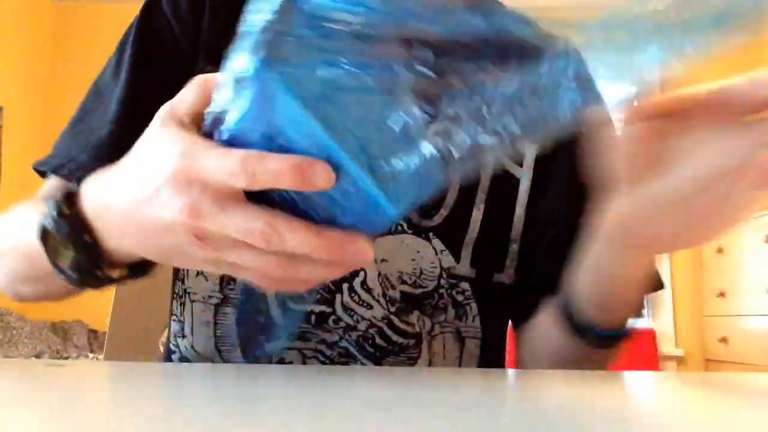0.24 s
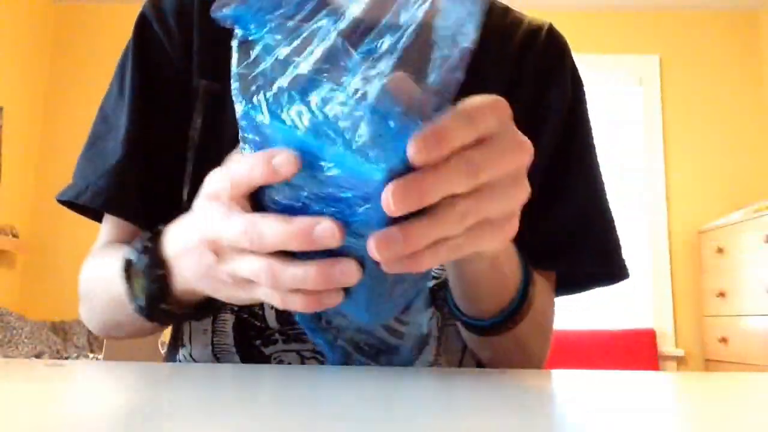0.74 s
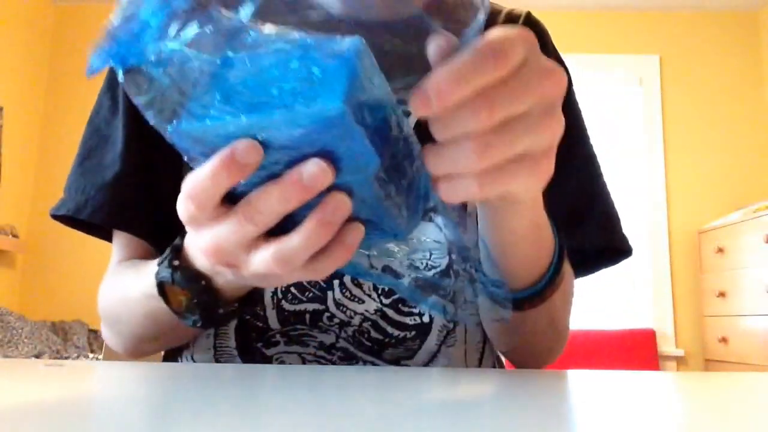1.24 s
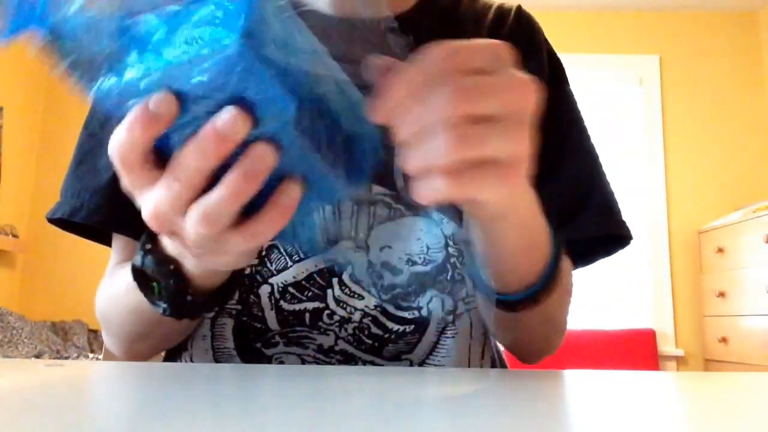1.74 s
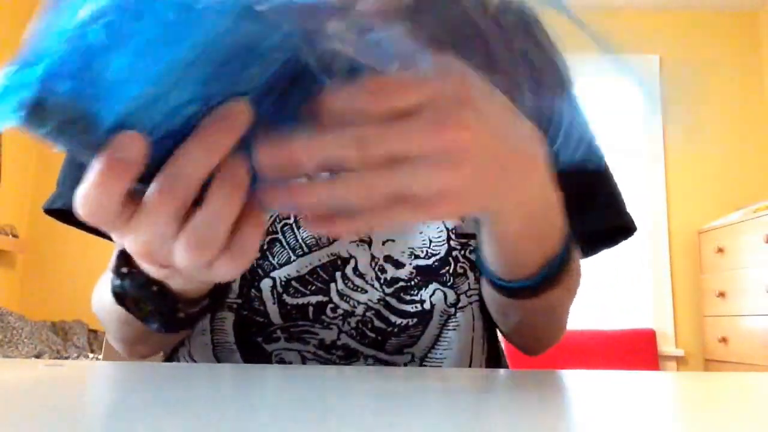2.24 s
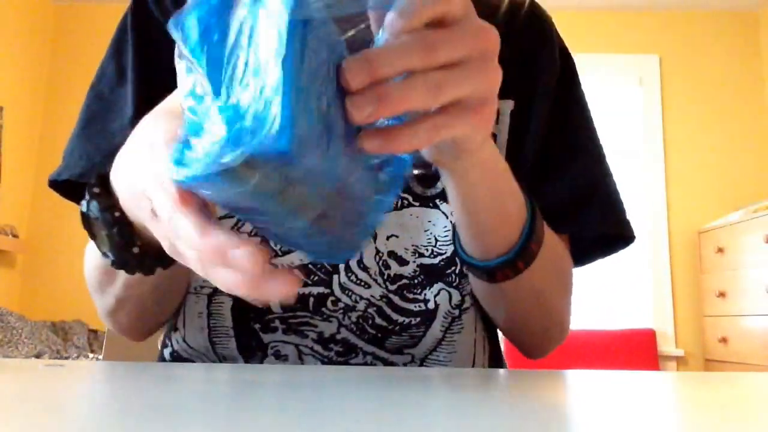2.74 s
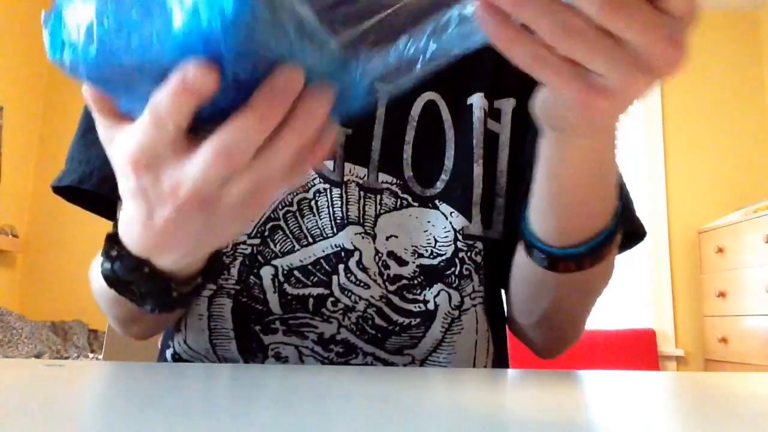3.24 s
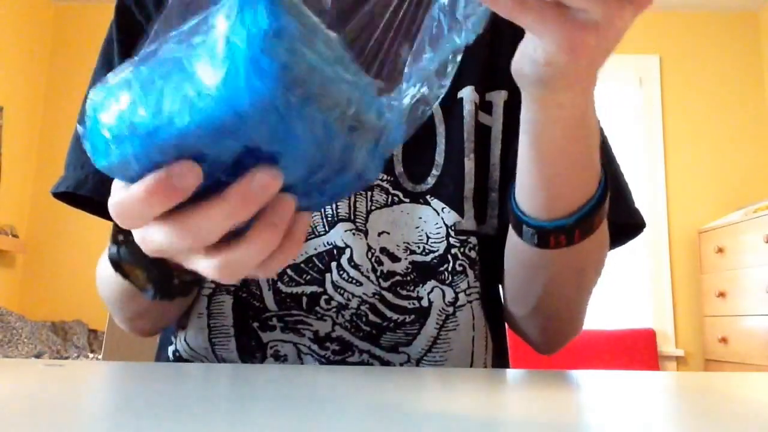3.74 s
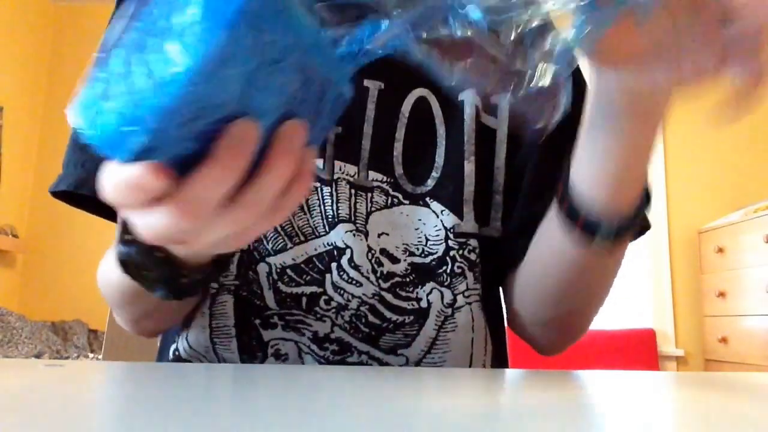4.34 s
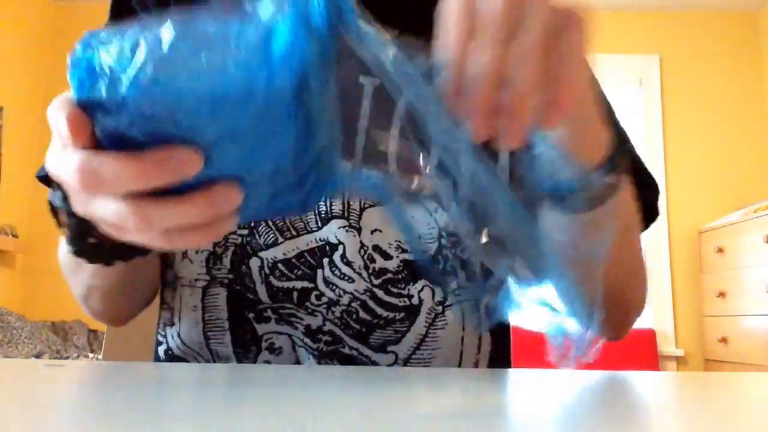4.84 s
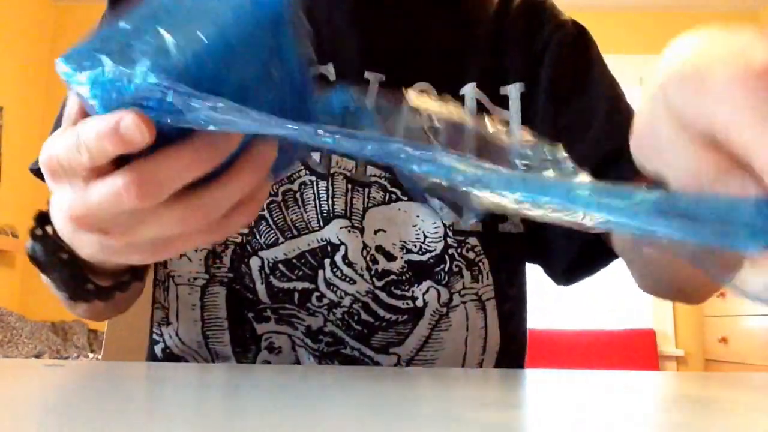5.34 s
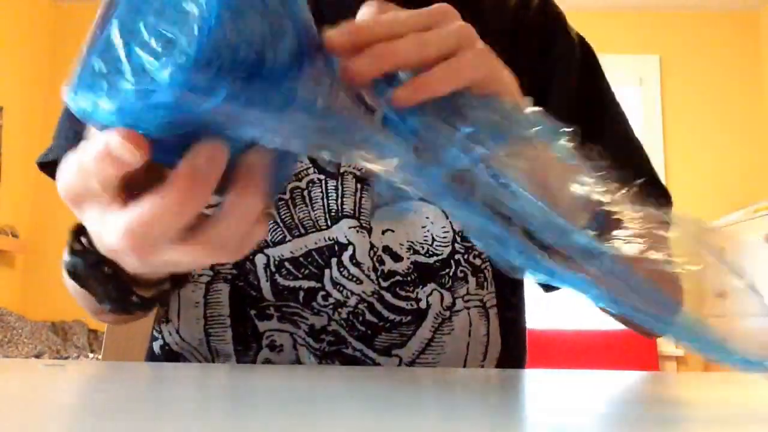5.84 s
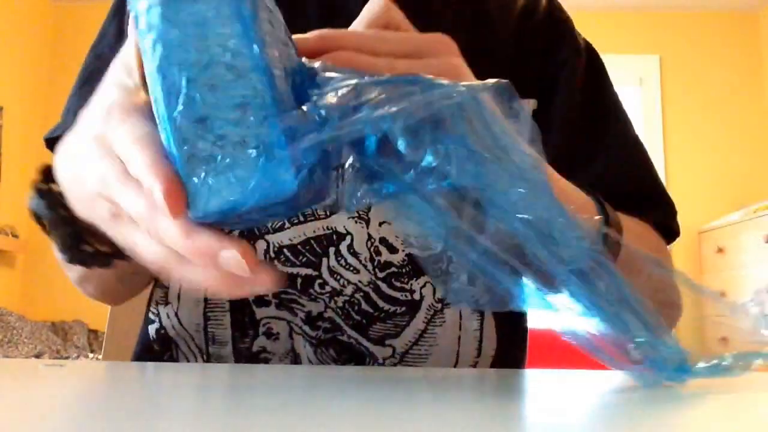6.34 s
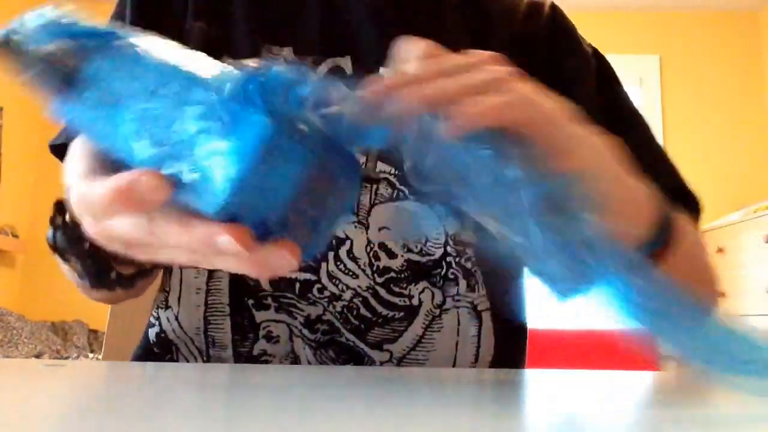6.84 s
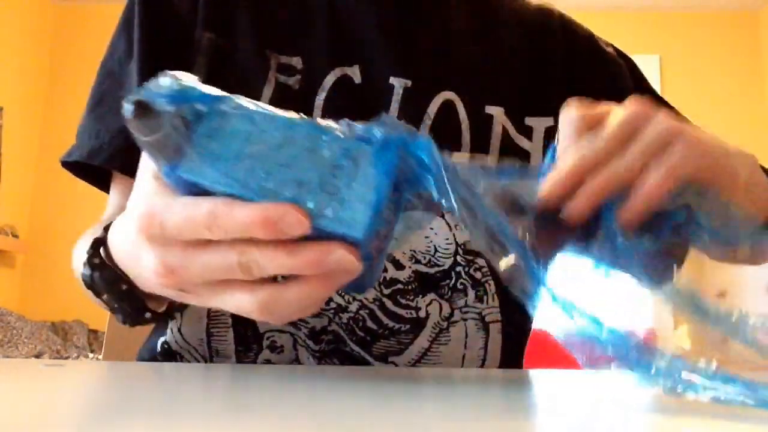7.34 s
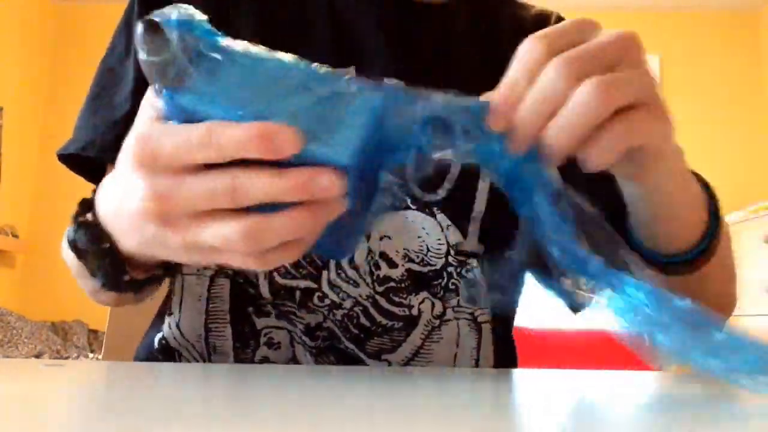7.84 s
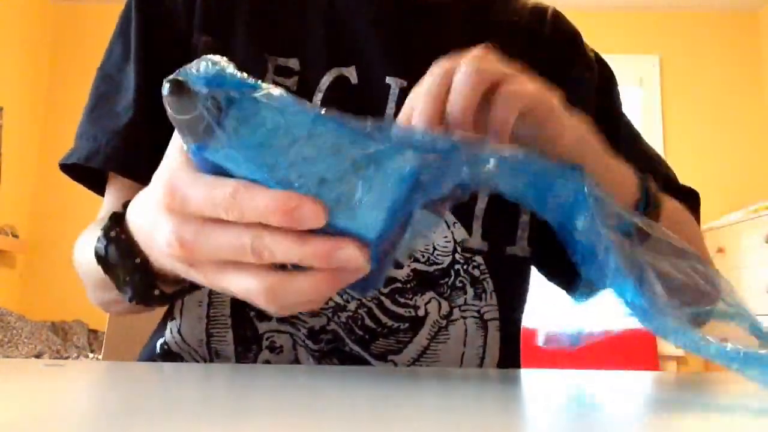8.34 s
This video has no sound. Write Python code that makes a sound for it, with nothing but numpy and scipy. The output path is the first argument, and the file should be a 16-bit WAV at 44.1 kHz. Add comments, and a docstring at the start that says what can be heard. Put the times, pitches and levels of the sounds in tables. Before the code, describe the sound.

Thin plastic cling film crinkles and crackles close by as hands pull it off a block, with sharp snaps and brief rips.

```python
"""At a table in a small room, hands pull cling film off a wrapped block, heard from close by.
The thin sheet buckles in swarms of tiny clicks that thicken with each pull, and single creases snap
through. Stick-slip friction between clinging layers makes stuttering rips and brief squeaks.
The block knocks dully, and the room booms after the loudest rip. Short reflections and one
standing wave colour the sound of the film, and a low rumble fills the room."""
import sys
import numpy as np
from scipy import signal
from scipy.fft import rfft, irfft
from scipy.io import wavfile
from scipy.ndimage import uniform_filter1d

SR = 44100
rng = np.random.default_rng(int(sys.argv[2]) if len(sys.argv) > 2 else 0)


def wav_record(signal):
    """Record a signal, one row per channel, as 16-bit PCM in the file named by sys.argv[1]."""
    frames = np.transpose(np.atleast_2d(signal))
    bounded = np.clip(frames, -1, 1)
    # unit amplitude maps onto the largest positive 16-bit level
    quanta = np.round(bounded * 32767).astype(np.int16)
    wavfile.write(sys.argv[1], SR, quanta)


N = 379260
TIME, FREQS = np.arange(N) / SR, np.fft.rfftfreq(N, 1 / SR)


def crinkle(levels_db):
    """Buckling radiates the elastic energy stored in the film; harder pulls shed more buckles."""
    crackle_db = levels_db[1]
    swarm = buckles(per_s=3000 * amp(0.08 * (crackle_db + 40)))
    swarm = refold(swarm, depth_db=1.85, patch_hz=1500, patch_s=0.021)
    swarm = swarm * flurries(depth_db=1.74, length_s=0.01)
    # radiation spectrum of the film: frequency_hz, gain_db
    film_spectrum = [(25, -75), (45, -32), (70, -10), (170, -4.5), (310, -2.5), (400, -2.5), (800, -5.5),
                     (1180, -5.5), (1500, -3), (3500, -2.5), (4400, -5.5), (12500, -5.5), (15500, -11.5)]
    spectrum = rfft(colour(swarm, amp(read(film_spectrum, FREQS)) * hollow()))
    # complementary bands, low to high: body, crackle, fizz, sizzle
    crossovers = [below(hz, order=6) ** 2 for hz in (1500, 5500, 10500)]
    bands = np.diff([np.zeros_like(FREQS), *crossovers, np.ones_like(FREQS)], axis=0)
    band_gains_db = [-1.24, -0.3, -3.17, -0.98]
    film = sum(amp(level_db + gain_db) * steady(irfft(spectrum * band, N), window_s=0.21)
               for band, level_db, gain_db in zip(bands, levels_db, band_gains_db))
    return film * flurries(depth_db=0.9, length_s=0.032)  # the film gives way unevenly


def buckles(per_s, spread_db=3.5, decay_cycles=1.08, tick_db=2.0, tick_s=0.0004, rub_db=-3.5, size=128):
    """Buckles form a Poisson process; each impulse ticks and rings its own small facet of film."""
    onsets = np.flatnonzero(rng.random(N) < per_s / SR)
    gain = amp(spread_db * np.minimum(rng.exponential(1, (len(onsets), 1)), 3.6))
    hz = 700 * (15000 / 700) ** rng.random((len(onsets), 1))
    t = np.arange(size) / SR
    rings = np.sin(2 * np.pi * hz * t) * np.exp(-t * hz / decay_cycles)
    polarity = rng.choice([-1, 1], hz.shape)
    rings = unit(rings * hz * polarity)  # small facets flip faster, so they radiate more strongly
    ticks = unit(rng.standard_normal(rings.shape) * np.exp(-t / tick_s))
    clicks = gain * (rings + amp(tick_db) * ticks)
    positions = onsets[:, None] + np.arange(size)
    swarm = np.bincount(positions.ravel(), clicks.ravel(), N)[:N]
    sliding_hiss = amp(rub_db) * rng.standard_normal(N)
    return steady(swarm, window_s=0.024) + sliding_hiss


def refold(x, depth_db, patch_hz, patch_s):
    """Radiation depends on shape: as the sheet refolds, its spectrum shifts in brief patches."""
    spectra = signal.stft(x, nperseg=256, noverlap=192)[2]
    bins, frames = round(patch_hz * 256 / SR), round(patch_s * SR / 64)
    patches = uniform_filter1d(rng.standard_normal(spectra.shape), bins, axis=0)
    patches = unit(uniform_filter1d(patches, frames, axis=1))
    return signal.istft(spectra * amp(depth_db * patches), nperseg=256, noverlap=192)[1][:N]


def flurries(depth_db, length_s):
    """Random amplitude modulation: buckles set each other off, so they come in uneven flurries."""
    return amp(depth_db * unit(smooth(rng.standard_normal(N), length_s)))


def hollow():
    """Cavity resonance between block, hands and table raises peaks in a gain over FREQS."""
    # cavity resonances, each added to a gain of one: centre_hz, width_hz, peak_db
    resonances = [(475, 140, -8.5), (645, 180, -6), (960, 154, 3)]
    return 1 + sum(amp(db) / (1 + (2 * (FREQS - hz) / width_hz) ** 2) for hz, width_hz, db in resonances)


def handling():
    """Incoherent sources add in power: pulls, grips and rustle set the dB levels of the four bands."""
    # hands draw film off the block; the last three are relative to the strength (taut sheet, peeling,
    # finest wrinkles): start_s, hold_s, strength_db, rise_s, release_s, body_db, fizz_db, sizzle_db
    pulls = [(0.0, .12, -42, 0.041, 0.071, -11, -3, 6.5), (0.924, .11, -32, .055, .055, -1.5, -3.5, -0.5),
             (1.61, 0.0076, -35, 0.017, 0.14, 0.5, -3, 1), (1.699, 0.018, -36, 0.12, 0.092, -1, -6, 3),
             (1.803, .012, -28.5, .12, .095, 0, -0.5, 2), (2.86, 0.078, -33, 0.14, 0.093, -1.5, 2.5, 2),
             (2.96, 0.0638, -30.5, 0.11, 0.082, -1.5, 5.5, -1),
             (3.09, 0.0721, -31.5, 0.18, 0.066, -0.5, 4, 2),
             (3.875, 0.039, -32.5, 0.071, 0.094, -1.5, 7, 3), (4.002, .1, -54, 0.081, .09, 1.5, 12, -3),
             (4.228, 0.1, -48.5, .14, 0.099, 0, 7.5, 3.5), (4.654, 0.092, -49, 0.028, 0.23, -0.5, 4, -5),
             (4.96, 0.026, -34, 0.086, .14, -1, 0.5, 4), (5.034, 0.016, -29, .03, .2, -4, -2, 0),
             (5.127, .19, -40, .05, .28, -10, -1.5, 3), (5.679, .27, -48, 0.1285, .25, -5, 1, 0),
             (6.82, .1, -30, 0.14, 0.19, -2, -2, -3.5), (7.169, .02, -28, .075, .18, -1.5, -1, -7.5),
             (7.705, 0.11, -28, 0.071, 0.07, -4, -2.5, 3.5), (7.869, .16, -45.5, 0.048, 0.098, -7, -2, 4),
             (8.496, 0.087, -26, 0.15, 0.098, -1.5, -4.5, -4)]
    # fingers shift their grip and crush a little film: peak_s, strength_db, treble_lift_db
    grips = [(0, -33, -2.5), (.07, -38, -7), (.13, -41, -2), (.43, -58, -8), (0.536, -46, -2),
             (0.668, -42, 0.5), (.745, -51.5, 4), (.785, -46, 0.5), (1.272, -39, -2), (1.525, -50, 0.5),
             (2.04, -47, 4.5), (2.11, -45, -3.5), (2.26, -47, -4), (2.322, -36, 0), (2.42, -43, -1),
             (2.467, -36.5, 3), (2.612, -45, 1.5), (3.32, -50, 3), (3.485, -50, 3), (3.6, -46.5, 1),
             (4.345, -45, 4), (5.31, -40.5, 2.5), (5.42, -40, -1), (5.565, -48.5, -5), (5.885, -42, -6),
             (6.15, -48, 1.5), (6.245, -46, -1), (6.465, -44, 0.5), (6.555, -50, 2.5), (6.65, -49.5, 1.5),
             (6.71, -58, -3), (7.045, -34, -4.5), (7.36, -47, -5), (7.465, -45, -1), (7.675, -38, -9),
             (8.118, -37.5, -4), (8.32, -50, -8)]
    # the loose sheet rustles while the hands move: time_s, strength_db
    rustle = [(0, -47), (.36, -63), (.62, -55), (.85, -54), (1.15, -67), (1.43, -62), (1.95, -55),
              (2.55, -50), (2.7, -55), (3.25, -52), (3.72, -56), (4.4, -58), (4.56, -68), (4.85, -50),
              (5.53, -58), (6.25, -54), (7.42, -51), (7.6, -57), (8.27, -56.5)]
    rustle_db = np.interp(TIME, *np.transpose(rustle))
    power = band_powers(rustle_db, body_db=-3, fizz_db=1.5, sizzle_db=-3)
    grip_rise_s, grip_release_s, grip_body_db = 0.06, 0.07, -3
    grip_strokes = [(peak_s, 0, db, grip_rise_s, grip_release_s, grip_body_db, lift_db, lift_db)
                    for peak_s, db, lift_db in grips]
    for start_s, hold_s, strength_db, rise_s, release_s, *colour_db in pulls + grip_strokes:
        level_db = strength_db + stroke(start_s, hold_s, rise_s, release_s)
        audible = level_db > -90
        power[:, audible] += band_powers(level_db[audible], *colour_db)
    return 10 * np.log10(power) + pauses()


def band_powers(level_db, body_db, fizz_db, sizzle_db):
    """Power is amplitude squared: one row each for body, crackle, fizz and sizzle."""
    return amp([[body_db], [0], [fizz_db], [sizzle_db]]) ** 2 * amp(level_db) ** 2


def stroke(start_s, hold_s, rise_s, release_s, swell_db=20):
    """Exponential envelope of a hand movement, in dB: it swells until start_s, holds and slackens."""
    before = np.maximum(start_s - TIME, 0) / rise_s
    after = np.maximum(TIME - start_s - hold_s, 0) / release_s
    return -swell_db * (before + after)


def pauses(settle_s=0.045, recover_s=0.012):
    """Excitation falls as the hands come to rest and returns as they set off: level dips in dB."""
    # brief rests of the hands: restart_s, depth_db
    rests = [(.66, 3), (2.66, 4), (3.585, 6), (4.165, 8), (5.535, 8.5), (6.615, 10), (7.635, 9), (8.295, 9)]
    dip_db = np.zeros(N)
    for restart_s, depth_db in rests:
        settling = np.exp(-np.maximum(restart_s - recover_s - TIME, 0) / settle_s)
        resting = np.clip((restart_s - TIME) / recover_s, 0, 1)
        dip_db -= depth_db * settling * resting
    return dip_db


def snaps(levels_db):
    """Snap-through of a crease gives a sharp front, a spray of tiny wrinkles and a short facet ring."""
    # the loudest creases, levels relative within each layer: start_s, ring_db, pitch_hz, tick_db
    loud_creases = [(0.0465, -17.5, 2920, -32), (.0558, -21, 1810, -28), (.074, -19.5, 1103, -31),
                    (0.4571, -29.5, 990, -48), (.51, -14.5, 3090, -30), (.5309, -20, 2510, -34),
                    (0.6298, -21.5, 3130, -35), (.6889, -23, 2360, -18), (0.813, -18, 3720, -26),
                    (0.828, -20, 1699, -28), (0.9199, -13, 2350, -18), (.966, -23, 1450, -16),
                    (0.9921, -10, 2540, -20), (1.031, -8, 2760, -16), (1.0393, -15, 1090, -11),
                    (1.0667, -26, 1930, -29), (1.1986, -21, 2650, -22.5), (1.271, -28, 1450, -24.5),
                    (1.54, -19, 3520, -29), (1.6108, -9, 1713, -13.5), (1.7055, -12.5, 1990, -33),
                    (1.8425, -5, 1830, -10), (1.9137, -22, 2072, -27), (2.004, -21.5, 2900, -21.5),
                    (2.158, -20, 2750, -25), (2.3202, -30, 2292, -30), (2.5126, -22.5, 1800, -26.5),
                    (2.5979, -19.5, 2117, -20), (2.6605, -36.5, 2011, -20.5), (2.7193, -19.5, 1971, -17),
                    (2.744, -27, 1902, -18.5), (2.777, -18, 1353, -11.5), (2.85, -13.5, 955, -9.5),
                    (2.9502, -6.5, 1596, -13), (3.0221, -8.5, 1560, -11), (3.089, -12, 1700, -15),
                    (3.3832, -16.5, 2419, -24.5), (3.489, -30.5, 1212, -31), (3.8195, -22, 1980, -30),
                    (3.849, -21, 1510, -22.5), (3.8856, -10.5, 1000, -23), (3.9101, -14, 1350, -19),
                    (3.958, -20.5, 1060, -30), (3.9741, -19.5, 1768, -10.5), (4.0669, -29.5, 846.3, -21),
                    (4.088, -35, 1340, -20.5), (4.1295, -32, 1797, -26.5), (4.3298, -24.5, 2071, -16.5),
                    (4.6627, -26.5, 1040, -31), (4.6987, -24, 1559, -27), (5.031, -12, 980, -4.5),
                    (5.0465, -5, 2330, -6), (5.1185, -11.5, 1980, -9), (5.1888, -14.5, 2119, -23),
                    (5.3079, -18, 1422, -14), (5.3345, -15.5, 2132, -22), (5.429, -17, 830, -21),
                    (5.698, -22.5, 2592, -34), (6.219, -25, 1410, -32), (6.3444, -19, 3337, -32),
                    (7.0337, -16, 1582, -15), (7.2295, -7.5, 2981, -13), (7.3083, -12.5, 2157, -14.5),
                    (7.71, -13, 2140, -9), (7.7463, -13, 2588, -5.5), (7.7525, -4, 2679, -12),
                    (7.7864, -10.5, 1893, -7.5), (7.8391, -17, 3176, -19), (7.894, -13.5, 2644, -15.5),
                    (7.9918, -29, 1677, -15.5), (8.0276, -20.5, 3873, -29), (8.1101, -16, 2095, -12),
                    (8.3923, -17, 1684, -36), (8.5299, -5, 1436, -24), (8.566, -6, 1231, -16)]
    rings, ticks = np.zeros(N), np.zeros(N)
    for start_s, ring_db, pitch_hz, tick_db in loud_creases + lesser_creases(levels_db):
        add(rings, start_s, amp(ring_db) * facet(pitch_hz, swell_cycles=0.55))
        front = ring(rng.uniform(6000, 11000), decay_s=0.00011)
        spray = np.tanh(tick(decay_s=0.0008))
        add(ticks, start_s, amp(tick_db) * (front + spray))
    return amp(-4.0) * colour(rings, above(410, order=3)) + colour(ticks, above(2800, order=2))


def lesser_creases(levels_db, usual_db=-45, usual_per_s=30, spread_db=2, spread_octaves=0.35):
    """A Poisson process draws rows for snaps(), denser and louder as the handling grows stronger."""
    rate_growth, level_growth = 0.18, 0.63  # dB per dB of handling
    _, crackle_db, fizz_db, _ = levels_db - usual_db
    per_s = usual_per_s * amp(rate_growth * crackle_db)
    onsets = np.flatnonzero(rng.random(N) < per_s / SR)
    loud, sharp, high = np.clip(rng.standard_normal((len(onsets), 3)), -2, 2).T
    ring_db = -32 + level_growth * crackle_db[onsets] + spread_db * loud
    tick_db = -29.5 + level_growth * fizz_db[onsets] + spread_db * sharp
    pitch_hz = 1880 * 2 ** (spread_octaves * high)
    return list(zip(onsets / SR, ring_db, pitch_hz, tick_db))


def facet(hz, swell_cycles, size=600):
    """A heavily damped oscillation: a facet of film swells as it flips over, then dies away."""
    cycles = hz * np.arange(size) / SR
    envelope = cycles / swell_cycles * np.exp(1 - cycles / swell_cycles)
    return np.sin(2 * np.pi * cycles) * envelope


def rips(fade_db=4):
    """Stick-slip friction: each uneven slip plucks the taut sheet, more weakly as the grip goes."""
    # clinging layers let go in runs of slips: start_s, level_db, length_s, slips_per_s, pitch_hz
    runs = [(1.6052, -17, 0.0046, 670, 1760), (2.992, -14, 0.031, 180, 1650), (3.866, -16, 0.032, 166, 750),
            (5.027, -14.5, .033, 133, 400), (6.824, -11.5, 0.0032, 496, 660.7),
            (6.8345, -12, 0.003, 740, 680), (6.89, -18, 0.026, 474, 600.5),
            (7.041, -17, 0.0038, 294, 398.8), (7.172, -3, .0125, 472, 706),
            (8.1117, -17.5, 0.0028, 1000, 1198)]
    out = np.zeros(N)
    for start_s, level_db, length_s, slips_per_s, pitch_hz in runs:
        for k in range(int(length_s * slips_per_s) + 1):
            jitter, scatter_db = rng.standard_normal(2)
            slip = ring(pitch_hz, decay_s=0.51 / pitch_hz) + amp(-2.5) * tick(decay_s=0.00084)
            slip_s = start_s + (k + 0.073 * jitter) / slips_per_s
            slip_db = level_db + scatter_db - fade_db * k / slips_per_s / length_s
            add(out, slip_s, amp(slip_db) * slip)
    return colour(out, above(186, order=3) * below(5100, order=2))


def squeaks(roughness=0.11):
    """Rapid stick-slip cycles merge into a rough note that glides with the tension of the film."""
    # stretched film rubs against itself: start_s, level_db, length_s, start_hz, end_hz
    glides = [(0.644, -45, 0.02, 1330, 2100), (0.726, -48, 0.024, 3020, 3550),
              (0.761, -41.5, 0.016, 4020, 4150), (0.762, -41.5, 0.012, 1980, 2450),
              (1.604, -28.5, 0.0068, 2060, 1690), (1.621, -30, .007, 1830, 1700)]
    out = np.zeros(N)
    for start_s, level_db, length_s, start_hz, end_hz in glides:
        size = int(length_s * SR)
        jitter = unit(uniform_filter1d(rng.standard_normal(size), size=30))
        pitch_hz = np.linspace(start_hz, end_hz, size) * (1 + roughness * jitter)
        note = np.sin(2 * np.pi * np.cumsum(pitch_hz) / SR)
        add(out, start_s, amp(level_db) * unit(note * np.hanning(size)))
    return out


def knocks_and_boom():
    """Damped free vibration: dull knocks of the block, and the room's low boom after the loudest rip."""
    # knocks of the block and one boom of the room: start_s, level_db, pitch_hz, t60_s
    low_notes = [(1.82, -41, 65, 0.13), (3.89, -42, 59.9, 0.11), (2.83, -35, 216, 0.16),
                 (2.95, -37, 67.92, 0.19), (3.14, -28.5, 167.9, 0.16), (4.577, -47, 338.4, 0.27),
                 (5.028, -24.5, 165, 0.088), (5.045, -29, 60, 0.12), (7.172, -29, 332.4, 0.047),
                 (7.187, -27.5, 140, 0.27), (8.538, -33, 160.9, 0.29)]
    out = np.zeros(N)
    for start_s, level_db, pitch_hz, t60_s in low_notes:
        add(out, start_s, amp(level_db) * ring(pitch_hz, t60_s / np.log(1000), size=12000))
    return colour(out, above(51, order=3))


def room(x, steps=40, mode_hz=135, mode_t60_s=0.11, coupling_db=-51):
    """Reflections, whose paths change as the hands move, and a standing wave add to the direct sound."""
    hop = N // steps
    padded, out = np.pad(x, hop), np.pad(x, hop)
    crossfade = np.sin(np.pi * np.arange(2 * hop) / (2 * hop))
    for k in range(steps + 1):
        part = padded[k * hop:][:2 * hop] * crossfade
        add(out, k * hop / SR, signal.fftconvolve(part, echoes(wet_db=-15.5)))
    out = out[hop:hop + N]
    mode = ring(mode_hz, mode_t60_s / np.log(1000), size=16000)
    add(out, 0.012, amp(coupling_db) * signal.oaconvolve(x, mode))
    return out


def echoes(wet_db, per_s=4000, gap_s=0.002, size=12000):
    """Diffuse reverberation: scattered reflections decay at a rate that depends on frequency."""
    # reverberation time of the room: frequency_hz, t60_s
    decay_times = [(100, 0.13), (500, 0.076), (4000, 0.071), (15000, 0.085)]
    reflections = rng.standard_normal(size) * (rng.random(size) < per_s / SR)
    reflections *= np.arange(size) > gap_s * SR
    hz, t, spectra = signal.stft(reflections, SR, nperseg=256)
    decay = 1000 ** (-t / read(decay_times, hz)[:, None])
    tail = signal.istft(spectra * decay, SR, nperseg=256)[1][:size]
    return amp(wet_db) * tail / np.linalg.norm(tail)


def rumble(floor_db=-60.5):
    """Low ambient noise: a steady floor and a few slow swells add in power."""
    # swells of the rumble: peak_s, level_db, half_width_s
    swells = [(0, -53, 0.11), (1.3, -54, 0.26), (2.02, -54.5, 0.22), (4.4, -56.5, .1), (5.98, -51.5, 0.17),
              (7.3, -53, .25), (8.23, -53.5, .12)]
    # spectrum of the rumble: frequency_hz, gain_db
    spectrum = [(25, -26), (55, -9), (80, -11), (105, 5), (135, -5), (190, -9.5), (300, -17), (800, -24.5),
                (3000, -39), (15000, -62)]
    power = amp(floor_db) ** 2
    for peak_s, level_db, half_width_s in swells:
        power += amp(level_db) ** 2 * np.exp(-((TIME - peak_s) / half_width_s) ** 2)
    noise = colour(rng.standard_normal(N), amp(read(spectrum, FREQS)))
    return np.sqrt(power) * unit(noise)


def ring(hz, decay_s, size=600):
    """A damped oscillator whose amplitude falls to 1/e in decay_s."""
    t = np.arange(size) / SR
    return np.sin(2 * np.pi * hz * t) * np.exp(-t / decay_s)


def tick(decay_s, size=600):
    """A broadband transient: noise with an exponential decay."""
    return rng.standard_normal(size) * np.exp(-np.arange(size) / SR / decay_s)


def colour(x, gain):
    """Minimum-phase filtering by a gain over FREQS keeps the fronts of clicks sharp."""
    cepstrum = irfft(np.log(np.maximum(gain, 1e-5)), N)
    cepstrum[1:N // 2] *= 2
    cepstrum[N // 2 + 1:] = 0
    return irfft(rfft(x) * np.exp(rfft(cepstrum)), N)


def above(hz, order):
    """High-pass gain over FREQS."""
    return 1 / np.sqrt(1 + (hz / (FREQS + 1)) ** (2 * order))


def below(hz, order):
    """Low-pass gain over FREQS."""
    return 1 / np.sqrt(1 + (FREQS / hz) ** (2 * order))


def smooth(x, window_s):
    """Two moving averages suppress fast fluctuations."""
    size = int(window_s * SR)
    return uniform_filter1d(uniform_filter1d(x, size), size)


def steady(x, window_s):
    """Division by the running rms evens the slow level and keeps the fine grain."""
    return x / np.sqrt(abs(smooth(x ** 2, window_s)) + 1e-12)


def amp(db):
    """Decibels to amplitude ratio."""
    return 10 ** (np.asarray(db) / 20)


def unit(x):
    """Normalisation to an rms of one."""
    return x / np.sqrt(np.mean(x ** 2) + 1e-20)


def read(points, hz):
    """Interpolation of a table on a log-frequency axis."""
    points_hz, values = np.transpose(points)
    return np.interp(np.log(hz + 1), np.log(points_hz + 1), values)


def add(mix, start_s, sound):
    """Superposition of a sound on the mix from start_s."""
    part = mix[max(round(start_s * SR), 0):][:len(sound)]
    part += sound[:len(part)]


def scene():
    """The film with its reflections, the knocks, the boom and the rumble superpose in one channel."""
    levels_db = handling()
    film = crinkle(levels_db) + snaps(levels_db) + rips() + squeaks()
    return (room(film) + knocks_and_boom() + rumble())[None]


def record(dry):
    """A linear-phase low-pass limits the bandwidth."""
    cutoff_hz = 15550
    low_pass = signal.firwin(401, cutoff_hz, window=("kaiser", 8), fs=SR)
    return signal.oaconvolve(dry, low_pass[None], "same")


dry = scene()
out = record(dry)
wav_record(out)
```